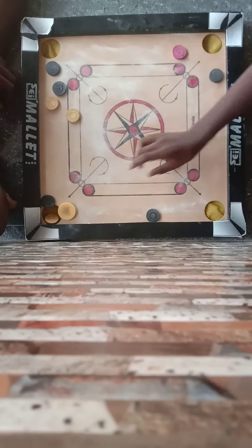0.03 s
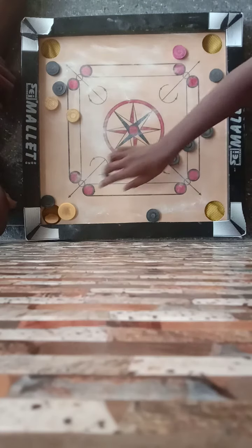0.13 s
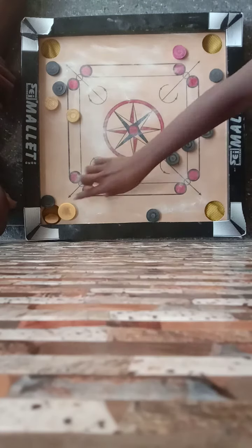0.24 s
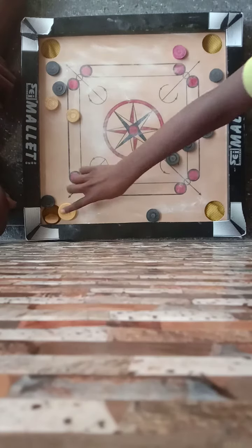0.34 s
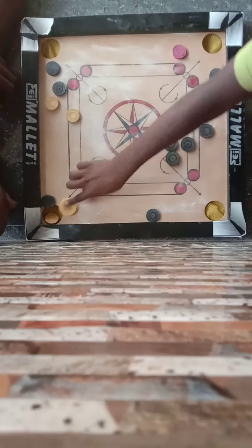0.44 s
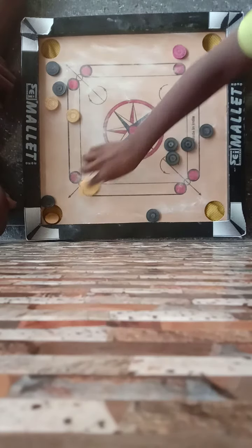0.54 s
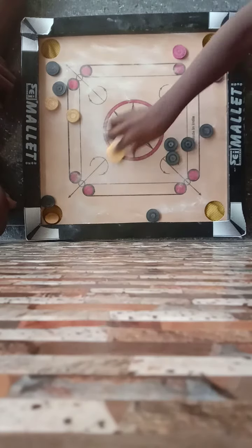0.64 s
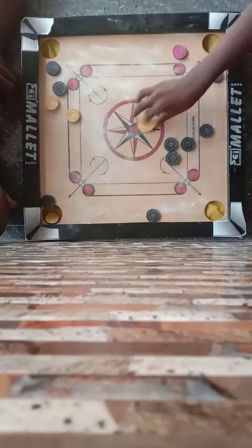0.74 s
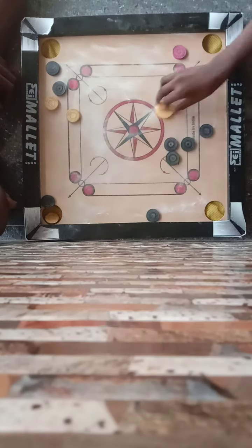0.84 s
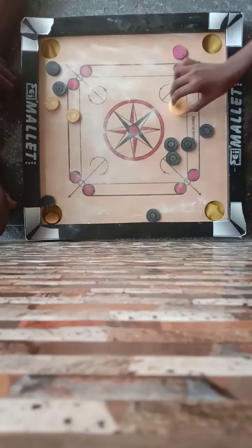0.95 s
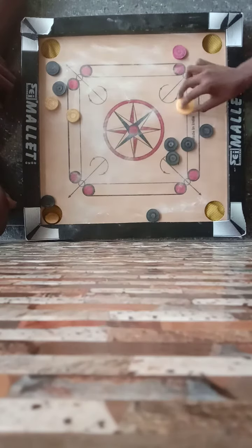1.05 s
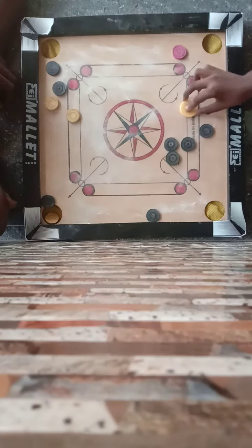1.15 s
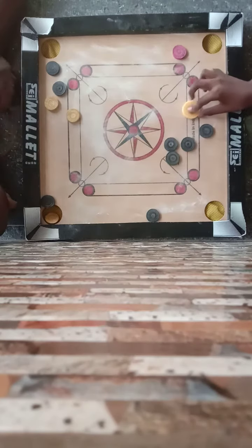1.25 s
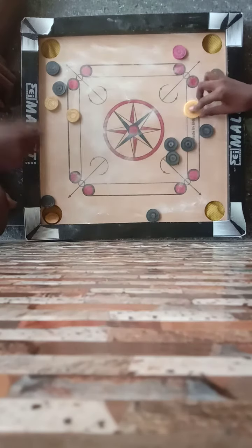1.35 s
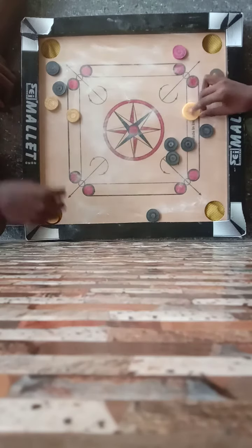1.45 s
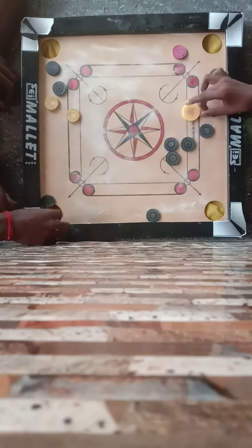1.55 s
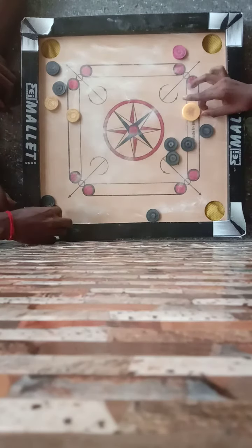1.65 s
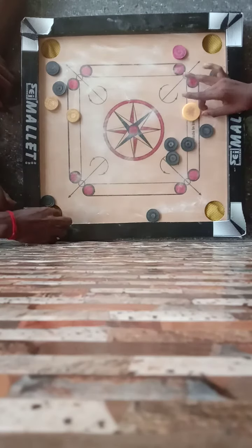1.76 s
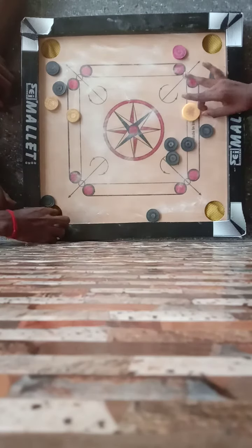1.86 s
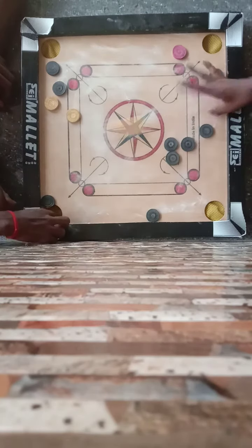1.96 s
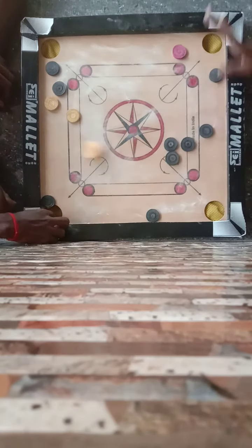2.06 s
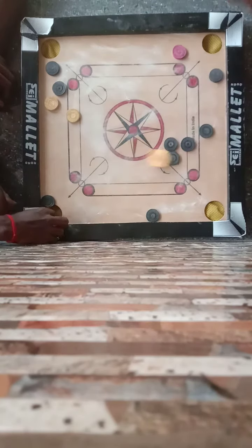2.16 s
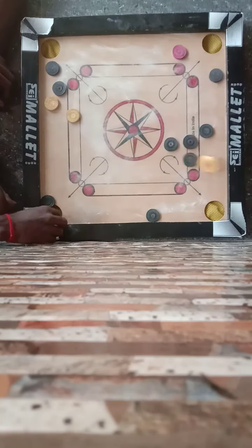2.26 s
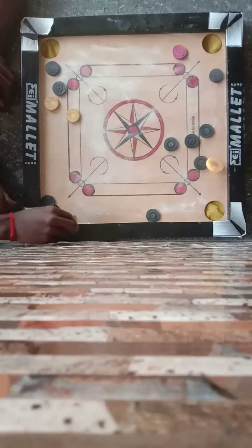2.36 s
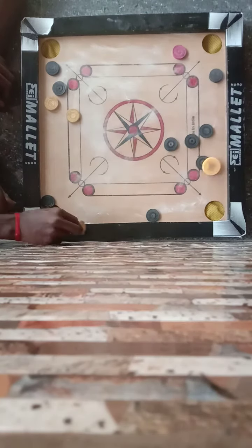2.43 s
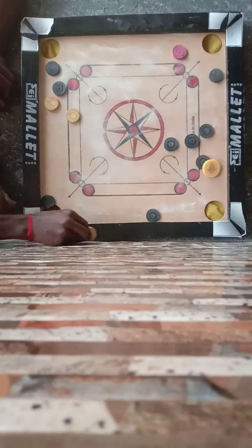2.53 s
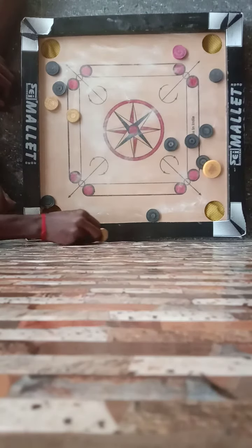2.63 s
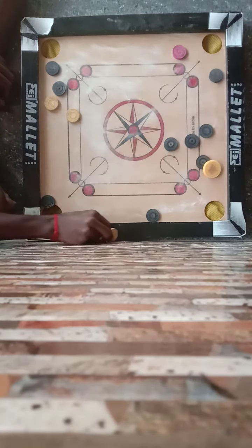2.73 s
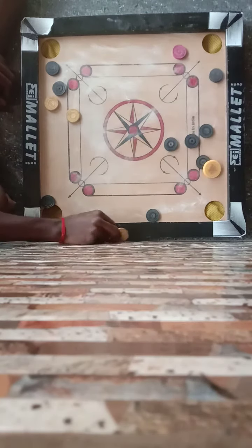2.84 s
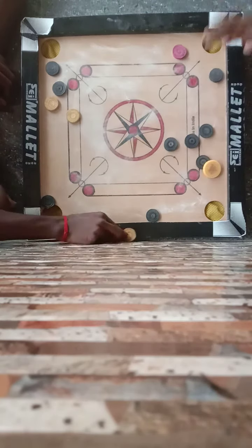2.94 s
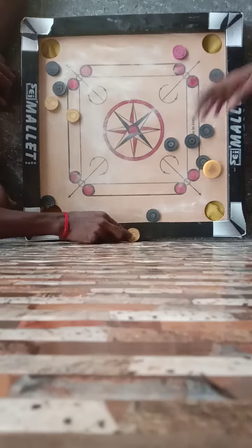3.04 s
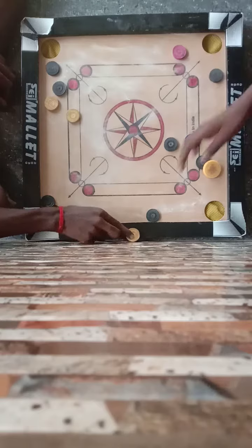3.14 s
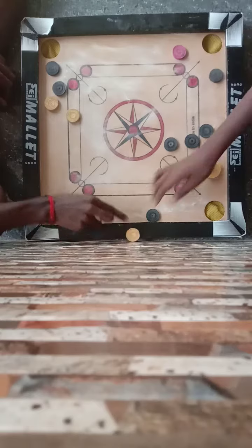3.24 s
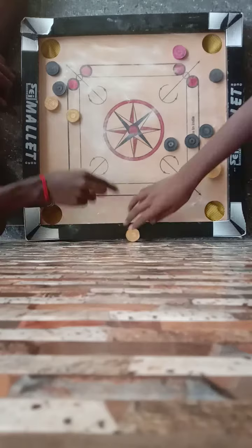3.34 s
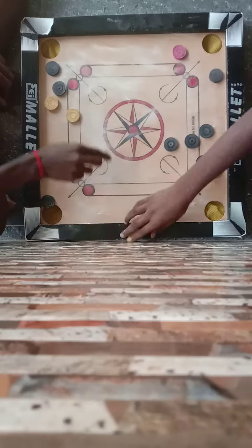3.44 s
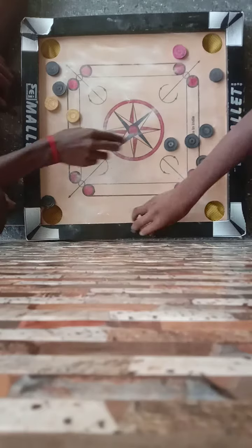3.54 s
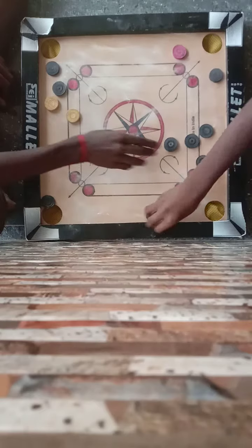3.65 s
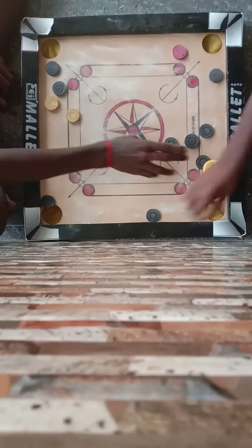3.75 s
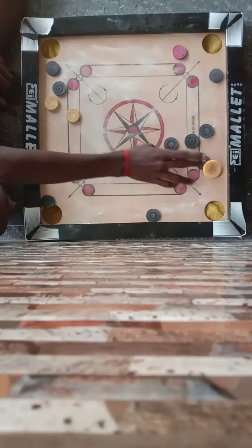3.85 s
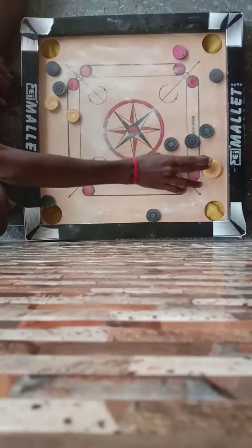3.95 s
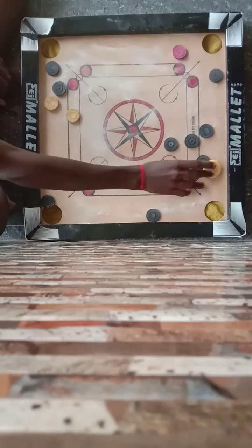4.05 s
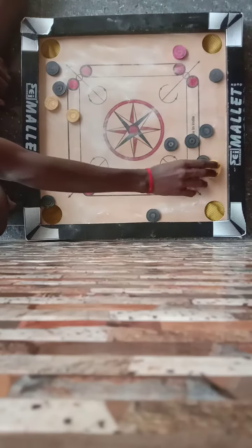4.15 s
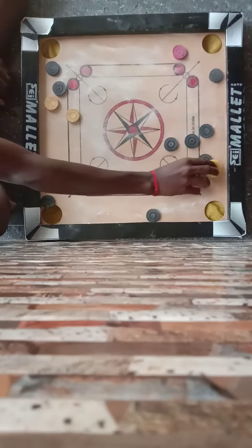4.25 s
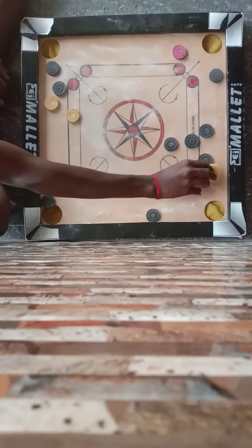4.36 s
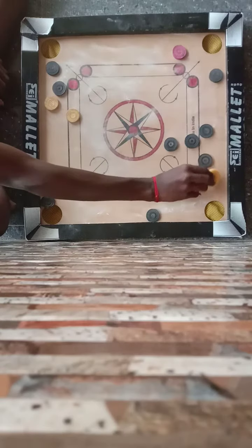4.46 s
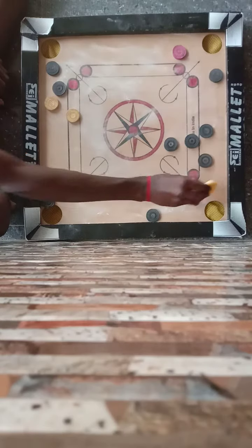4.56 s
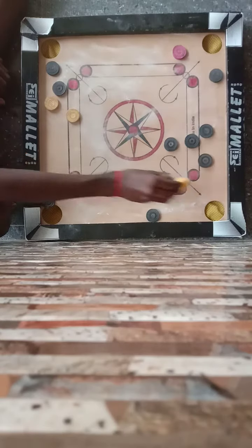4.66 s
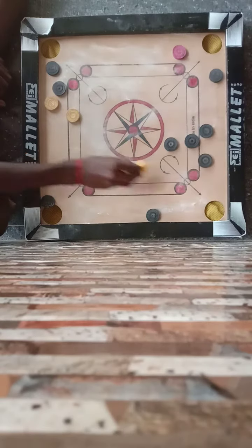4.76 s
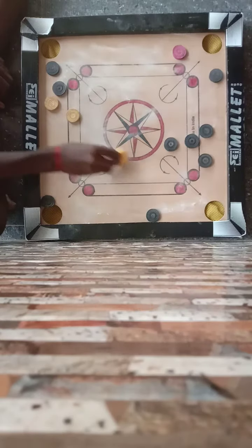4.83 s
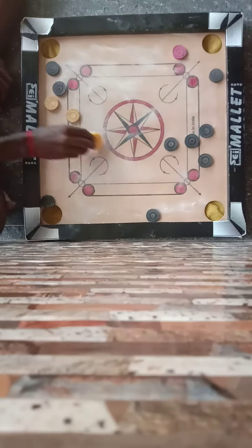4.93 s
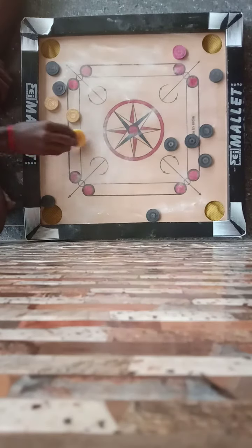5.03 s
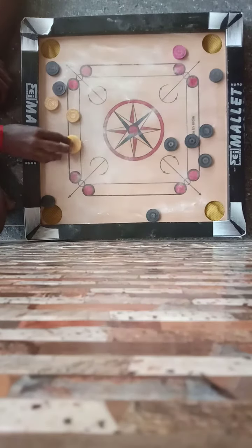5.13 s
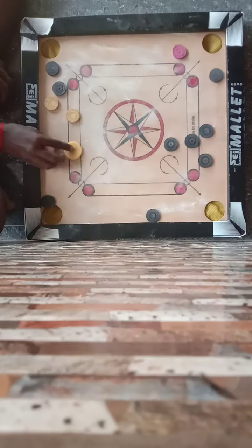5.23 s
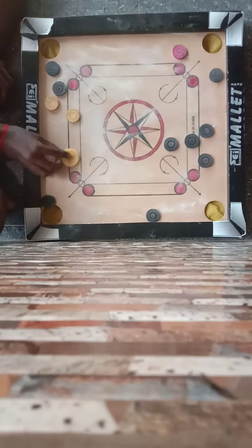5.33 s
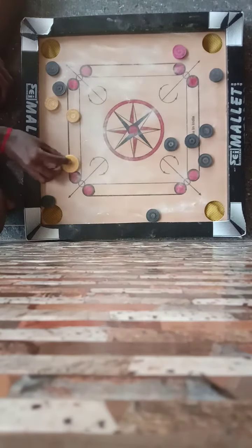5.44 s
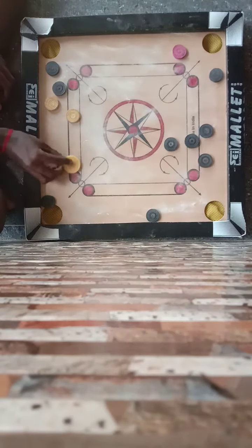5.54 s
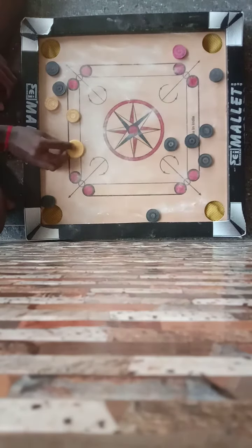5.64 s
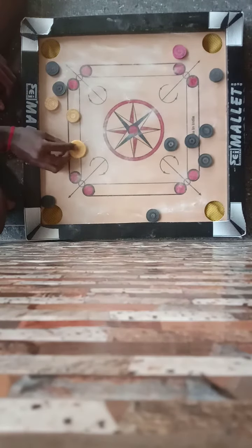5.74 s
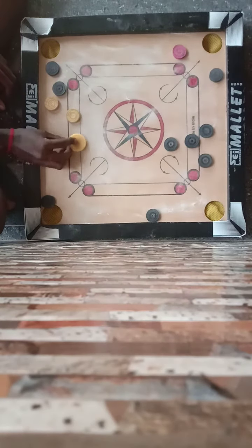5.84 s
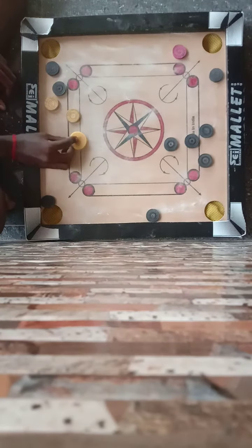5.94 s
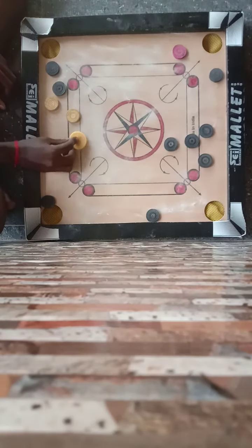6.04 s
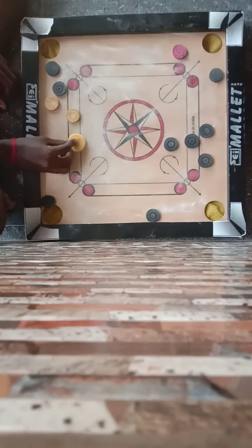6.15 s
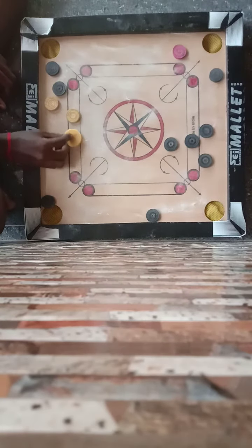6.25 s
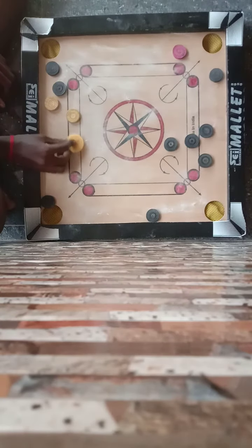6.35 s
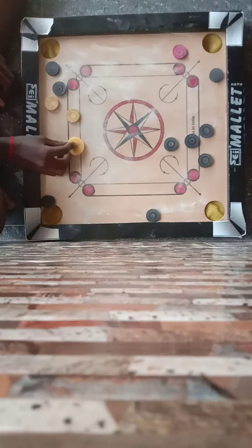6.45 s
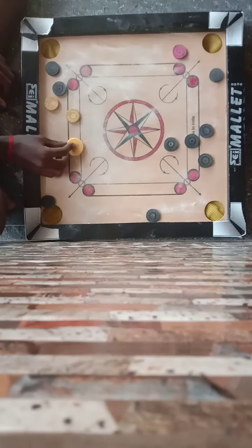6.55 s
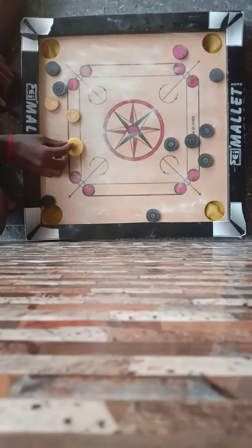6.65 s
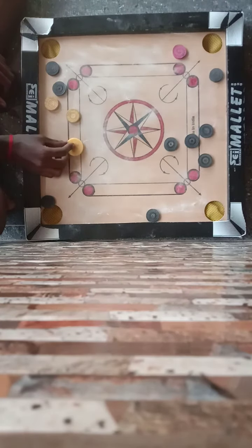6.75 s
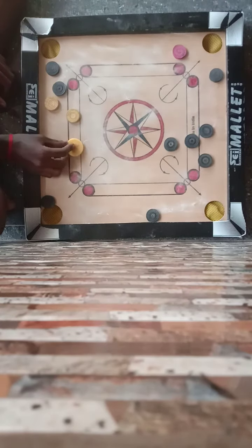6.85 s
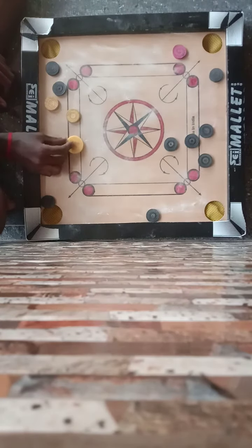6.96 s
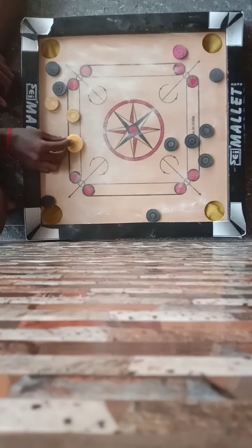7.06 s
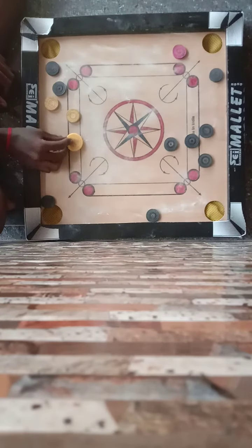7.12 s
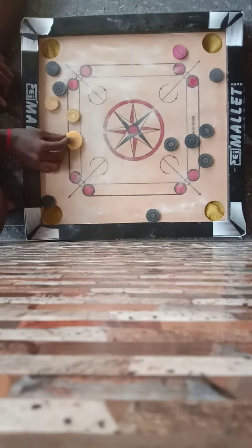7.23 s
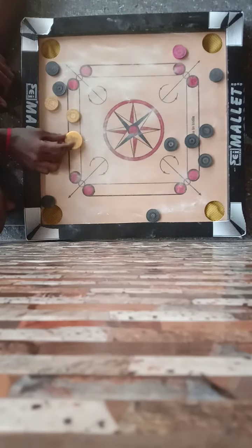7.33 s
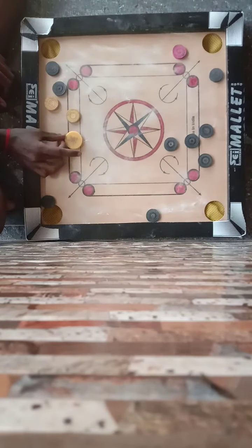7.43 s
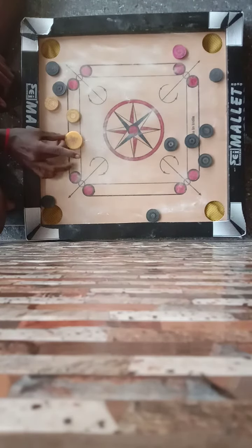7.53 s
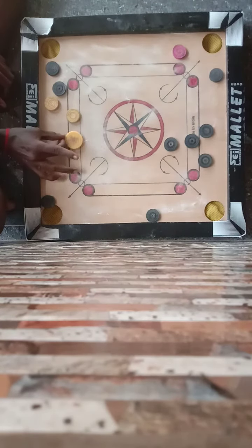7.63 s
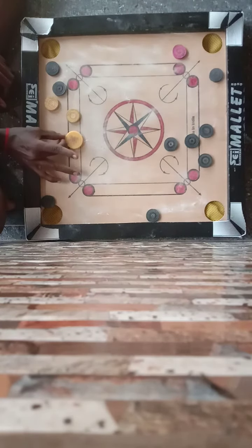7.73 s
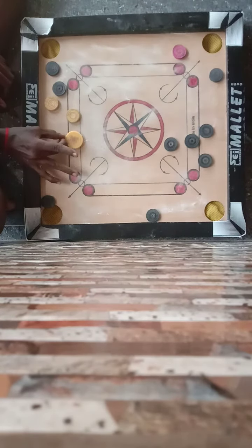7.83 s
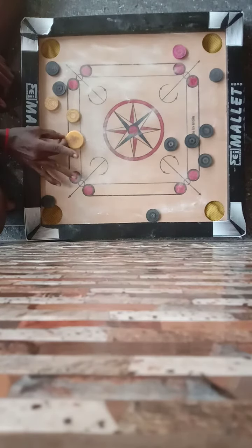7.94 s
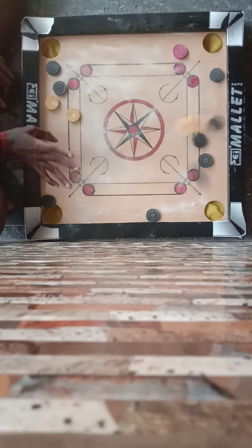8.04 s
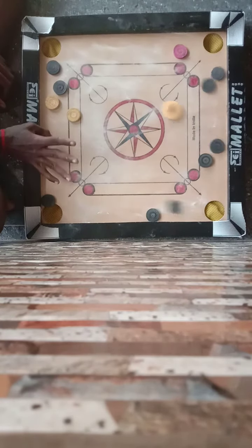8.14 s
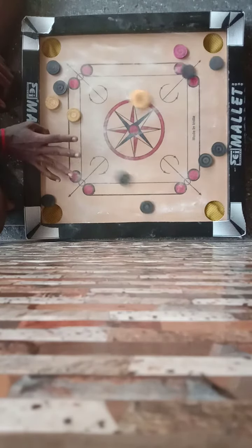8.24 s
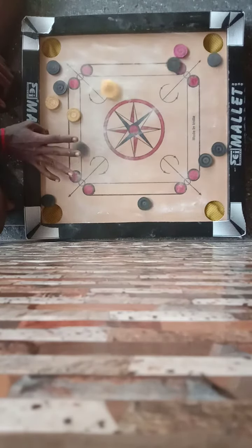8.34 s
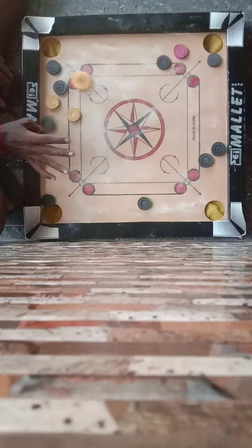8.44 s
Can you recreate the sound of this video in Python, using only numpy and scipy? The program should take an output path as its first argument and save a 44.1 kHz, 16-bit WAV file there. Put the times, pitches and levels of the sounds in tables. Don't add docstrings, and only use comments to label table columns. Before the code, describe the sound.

A heavy striker is flicked across a wooden board, clacking rapidly into discs and frame with knocky thumps, powdery scrapes and a second shot later.

```python
import sys
import numpy as np
from scipy import signal
from scipy.fft import rfft, irfft, next_fast_len
from scipy.io import wavfile
from scipy.ndimage import uniform_filter1d, minimum_filter1d, map_coordinates

SR = 44100
rng = np.random.default_rng(int(sys.argv[2]) if len(sys.argv) > 2 else 0)


def magnitude_from_level(level_db):
    exponent = np.asarray(level_db, float) / 20
    return 10 ** exponent


def to_wav(sig):
    pcm = np.clip(np.atleast_2d(sig), -1, 1) * 32767
    pcm = np.round(pcm).astype(np.int16)
    wavfile.write(sys.argv[1], SR, pcm.T)


N = 374409

# [t/s, level/dB]
TRAFFIC = [
    (0, -53),
    (0.64, -49),
    (1.25, -54),
    (2.24, -48.5),
    (3.5, -53.5),
    (4.8, -49.5),
    (6.93, -51),
    (7.83, -53.5),
    (8.49, -57),
]
# [f/Hz, density/dB per Hz]
HUM_SPECTRUM = [(15, -74), (25, -32), (70, -5.5), (172, 4.5), (205, 1), (339, 3), (420, -11.5), (500, -47),
                (650, -61), (1100, -120)]
DRONE_SPECTRUM = [(260, -55), (450, -1.5), (526, -73), (559, -1), (711, 9), (769, -4), (812, 5), (967, 0.5),
                  (1090, 3), (1270, 7.5), (1550, -4.5), (1900, -18), (2470, -55), (4180, -120)]
HISS_SPECTRUM = [(1300, -29), (1700, -3), (2300, -7.5), (3200, -9.5), (4500, -13), (6000, -14), (6700, -20),
                 (7300, -3), (8200, -13), (9500, -28.5), (11000, -33), (13700, -37), (15000, -35),
                 (15700, -32)]
# [f/Hz, width/Hz, level/dB]
WHINE_MODES = [(14900, 130, -9), (15100, 110, -15)]
# [t/s, length/s, start f/Hz, end f/Hz, level/dB]
BIRDS = [
    (.22, 0.077, 4200, 4420, -52),
    (.92, 0.094, 4580, 4640, -54),
    (1.19, 0.13, 3250, 3180, -62),
    (1.21, 0.11, 5200, 5100, -57),
    (1.64, 0.086, 4630, 4600, -57),
    (1.698, 0.05, 4200, 4280, -55),
    (3.355, 0.064, 4000, 4100, -56),
    (4.019, 0.05, 4170, 4300, -55),
]
# [t/s, peak level/dB, f/Hz]
PUFFS = [(2.629, -44, 90), (2.797, -43, 99), (3.085, -23.5, 97), (3.153, -31, 76.5), (3.257, -27.5, 124),
         (3.353, -28.5, 71), (3.414, -34, 107), (3.464, -22, 95), (3.508, -34, 76), (3.609, -38.5, 93),
         (3.679, -39, 56.5), (3.739, -37, 59), (3.769, -32, 106), (3.83, -40, 81), (3.908, -38, 67.4),
         (6.236, -40, 122), (6.562, -42, 86.5), (6.72, -41, 77.6), (7.202, -46, 75), (7.372, -35.5, 103),
         (7.462, -33, 86), (7.501, -34, 83), (7.568, -33.5, 96), (7.659, -36, 78), (7.699, -38, 54),
         (7.738, -31, 89.5), (7.775, -31, 96), (7.819, -42, 67), (7.864, -35.5, 149), (7.889, -35.5, 78)]
# [f/Hz, t60/s]
ROOM_T60 = [(200, 0.22), (500, 0.16), (1400, 0.28), (4000, 0.28), (10000, 0.21)]
# [f/Hz, width/Hz, level/dB]
BOOM_MODES = [(325.7, 8.2, -2), (418.2, 19.6, 3), (485, 63, -8.5)]
# [f/Hz, width/Hz, level/dB]
KNOCK_MODES = [(577, 28, 0), (712.6, 22, -0.5), (816.3, 30, 0), (940, 45, 1), (1089, 124, 1),
               (1246.7, 45.7, 10), (1546, 270, -3.5), (1563, 94, 1), (2130, 710, -13.5)]
# [f/Hz, width/Hz, level/dB]
SNAP_MODES = [(760, 170, -4), (1210, 144, 2)]
# [f/Hz, density/dB per Hz]
CLICK_SPECTRUM = [(1000, -42), (1700, -1), (2600, 2), (4200, 1), (6000, -0.5), (6700, -2), (7400, 1),
                  (8600, -11), (10000, -18.5), (12500, -37.5), (14000, -27), (15000, -27), (15600, -43),
                  (15800, -101)]
POWDER_SPECTRUM = [(1000, -55), (1700, -4), (1880, 0.5), (2470, -2.5), (2710, 0.5), (3140, -1), (4310, 2),
                   (5140, -2), (7250, 4.5), (11000, -13), (13400, -24), (14800, -10), (15700, -11)]
# [t/s, length/s, rumble level/dB, powder level/dB, low modes rel. level/dB]
DRAGS = [(0.0, 0.058, -56, -91, -16), (0.19, 0.3, -54, -72, -20), (0.385, 0.16, -32, -50, -5),
         (0.42, 0.49, -26, -31.5, -6.5), (3.49, 0.054, -46, -40.5, -18), (3.52, 0.095, -41.5, -48.5, -5),
         (3.6, 0.14, -78, -46.5, -10), (3.72, 0.089, -62, -43.5, -3), (3.8, .12, -53, -46, -6),
         (3.92, 0.11, -57, -56, -9), (4.18, 0.14, -55, -67, 7.5), (4.28, 0.13, -38, -52.5, -29),
         (4.41, 0.1, -37.5, -54, -19), (4.86, 0.18, -47, -43, -5), (5.26, 0.23, -36, -50.5, -26),
         (5.55, 0.11, -28.5, -39.5, -9), (5.74, 0.14, -40.5, -59, -2.5), (6.19, 0.1, -39, -52.5, -10),
         (6.32, 0.095, -37, -48, -18), (6.81, 0.35, -53, -66, -5), (5.96, 0.11, -79, -81, -7),
         (7.56, 0.18, -53, -68, -22), (7.93, 0.076, -40.5, -52, -2), (8.03, 0.17, -18.5, -25.5, -12.5)]
# [t/s, length/s, rumble level/dB, powder level/dB, low modes rel. level/dB]
GLIDES = [(1.1, 0.41, -49.5, -64, -5), (1.928, 0.31, -30.5, -32.5, 1), (2.02, 0.27, -19.5, -29.5, -17.5),
          (2.15, 0.092, -17, -53, -11), (2.32, 0.097, -16, -47, -9.5), (2.41, 0.19, -22, -32, -15),
          (2.87, 0.04, -42.5, -34, 17), (4.84, 0.46, -27, -41.5, -14.5), (5.11, 0.43, -40.5, -51.5, -9),
          (7.46, 0.068, -70, -65, -6), (7.97, 0.11, -30.5, -29.5, 2.5), (8.2, 0.67, -25.5, -36.5, -6.5),
          (8.45, 0.17, -24.5, -40, -17)]
# [t/s, rumble level/dB]
RESTING = [
    (0, -46.5),
    (1.7, -47),
    (2.7, -51),
    (4.1, -48),
    (4.75, -48),
    (6.0, -42.5),
    (6.9, -50),
    (7.6, -52.5),
    (8.49, -38),
]
# [t/s, knock/dB, boom rel./dB, click rel./dB, first arrival rel./dB]
ON_BOARD = [(0.145, -28.5, -14, -39, -14), (0.396, -24, -9, -32, -9), (0.46, -13.5, 8.5, -20, -11),
            (0.494, -10, 4.5, -39, -2), (1.424, -25, 2.5, -44, 2), (2.143, -1, 1.5, -24, -8),
            (4.828, -2, 2.5, -24.5, -5), (4.857, -9.5, -23, -33, -13), (4.885, -25, -17, -35, -7),
            (5.104, 0.5, -3.5, -27, -4), (5.772, -32, -25, -44, -6)]
# [t/s, knock/dB, boom rel./dB, click rel./dB, first arrival rel./dB]
STRIKER = [(1.089, -3, -7, -19, -5), (1.128, -15, -18, -41, 3), (1.195, -24.5, -20, -39, -7),
           (1.251, -26, -5, -32, -10), (1.967, -7, -6, -17.5, -23), (1.998, -3, -13, -37, -9),
           (2.017, -3, -3.5, -5.5, 0), (2.064, -14.5, -22, -0.5, -15), (2.181, -4, -8, -16, 0),
           (2.356, -6.5, -30, -27, -4), (2.375, -4, -30, -29, -7), (2.387, -2.5, -23, -33, -5),
           (2.463, -1, -28, -17.5, -1), (2.504, -4.5, -35, -20, 1), (8.063, -8, -34, -2.5, -5),
           (8.083, -17.5, -20, 2.5, -11)]
# [t/s, knock/dB, boom rel./dB, click rel./dB, first arrival rel./dB]
FLICKS = [
    (1.943, -8.5, -11, -22, -5),
    (2.025, -20, 9, -4, -3),
    (2.867, -10.5, -5, -3.5, -4),
    (3.52, -26, -21, -20, -7),
    (3.721, -42, 27, 0.5, -9),
    (7.456, -44.5, -14, 10.5, -2),
    (7.969, -13.5, -12, -16, -16),
    (8.02, -9.5, 0, -9.5, -6),
    (8.031, -9.5, -5, -7, -8),
]
# [t/s, knock/dB, boom rel./dB, click rel./dB, first arrival rel./dB]
DISCS = [
    (1.457, -34, 12, -37, 0),
    (2.276, 0, -8, -24.5, -4.5),
    (2.333, -7, -27, -16, 2.5),
    (2.412, -11.5, 1.5, -2.5, -1.5),
    (2.439, -6.5, -27, -21, 1.5),
    (3.061, -41, 17.5, -31.5, -13),
    (3.554, -24, 12.5, -26, -15),
    (6.335, -22, -32, -23, -18),
    (8.147, -8, -21, -7, -8),
]
# [t/s, knock/dB, boom rel./dB, click rel./dB, first arrival rel./dB]
FRAME = [
    (2.3, -1.5, -18.5, -32, -3),
    (2.317, -2.5, -9, -20, -13),
    (2.771, -15.5, -11, -20.5, -8),
    (6.854, -40.5, -16, -4, 3),
    (8.177, -6, -15, -20, -1),
    (8.19, -11, -24, -24, -1),
    (8.288, -14, -15, -30, -3),
    (8.456, -13.5, -5, -12.5, 1),
]
# [ring f/Hz, brightness/dB per octave, favoured mode f/Hz, mode lift/dB,
#                   room rel. knock/dB, ring level/dB]
KINDS = [
    (4100, -8.5, 770, 1, -11, -6),
    (4600, 1, 1720, 10, -8, -0.5),
    (5870, 16.5, 920, 1, -5.5, 10),
    (7300, 4, 1380, 2.5, -4, -2),
    (3670, -26, 786, 13, -3, -12),
]
# [f/Hz, rel. level/dB]
SIDE_SPECTRUM = [(60, -48), (200, -38), (400, -49.5), (1300, -45.5), (2500, -48), (5000, -43), (8000, -51),
                 (13000, -29)]
# [t/s, length/s, gain/dB]
DUCKS = [
    (2.394, .009, 1),
    (8.004, 0.0059, -7),
    (8.046, 0.0087, -6.5),
]

DRONE_DB, HISS_DB, WHINE_DB = -51, -61, -84
PUFF_T60_S = 0.12
PUSH_OFF_S = 0.013
LINGER_S = 0.02
RUMBLE_POWER, HISS_POWER = 1, 1.96
REST_HISS_DB, REST_DEEP_DB, REST_SHIFT_DB, REST_HISS_SHIFT_DB = -17, -9, 3.5, 1.5
LEAD_S = 0.0077
SPOT_DB = 2.5
CONTACT_SAMPLES = 16384
TOP_HZ = 15800


def unit(x):
    return x / np.sqrt(np.mean(x ** 2) + 1e-20)


def peak_one(x):
    return x / np.max(np.abs(x))


def along(points, hz):
    f, v = np.transpose(points)
    return np.interp(np.log(hz + 1), np.log(f + 1), v)


def filtered(x, response):
    m = next_fast_len(len(x) + 8192)
    return irfft(rfft(x, m) * response(np.fft.rfftfreq(m, 1 / SR)), m)[:len(x)]


def coloured(x, spectrum):
    return filtered(x, lambda f: magnitude_from_level(along(spectrum, f)))


def resonances(f, modes):
    responses = []
    for k, (centre, width, db) in enumerate(modes):
        loss = 1j * f * width
        responses.append((-1) ** k * magnitude_from_level(db) * loss / (centre * centre - f * f + loss))
    return np.array(responses)


def rung(x, modes):
    return filtered(x, lambda f: resonances(f, modes).sum(axis=0))


def wobble(rate_hz):
    knots = rng.standard_normal(int(N * rate_hz / SR) + 4)
    return map_coordinates(knots, [np.arange(N) * rate_hz / SR])


def patchy(depth_db, size):
    z = signal.stft(rng.standard_normal(N), nperseg=512)[2]
    field = uniform_filter1d(rng.standard_normal(z.shape), size // 2, axis=0)
    field = uniform_filter1d(field, 2 * size, axis=1)
    return signal.istft(z * magnitude_from_level(depth_db * unit(field)), nperseg=512)[1][:N]


def reverb(count):
    hz, t, z = signal.stft(rng.standard_normal(count), SR, nperseg=256)
    decay = magnitude_from_level(-60 * t / along(ROOM_T60, hz)[:, None])
    tail = signal.istft(z * decay, SR, nperseg=256)[1][:count]
    tail *= np.clip(np.arange(count) / SR / 0.007, 0, 1) ** 1.3
    return tail / np.linalg.norm(tail)


def outdoors():
    hum = unit(magnitude_from_level(1.1 * wobble(4.8)) * coloured(patchy(5, size=3), HUM_SPECTRUM))
    hum = unit(hum + 1.26 * rung(hum, [(173.2, 8.4, 0.0073)]))
    drone = unit(magnitude_from_level(1.17 * wobble(2.965)) * coloured(patchy(2.2, size=4), DRONE_SPECTRUM))
    hiss = unit(coloured(patchy(2.5, size=4), HISS_SPECTRUM))
    whine = unit(rung(rung(rng.standard_normal(N), WHINE_MODES), WHINE_MODES))
    hum_db = np.interp(np.arange(N) / SR, *np.transpose(TRAFFIC)) + 2.0
    return magnitude_from_level(hum_db) * hum + magnitude_from_level(DRONE_DB) * drone + magnitude_from_level(HISS_DB) * hiss + magnitude_from_level(WHINE_DB) * whine


def birds():
    out = np.zeros(N + SR)
    flock = rng.random((130, 5)) * [N / SR, 0.1, 4000, 300, 9] + [0, 0.04, 1900, -150, -74]
    flock[:, 3] += flock[:, 2]
    for s, length_s, start_hz, end_hz, db in [*BIRDS, *flock]:
        count = round(length_s * SR)
        waver = uniform_filter1d(rng.standard_normal(SR // 5), size=80)[:count]
        hz = np.linspace(start_hz, end_hz, count) + 500 * waver
        whistle = np.hanning(count) * np.sin(2 * np.pi * np.cumsum(hz) / SR)
        out[round(s * SR):][:count] += magnitude_from_level(db) * whistle
    return 0.53 * out[:N] + 0.49 * signal.fftconvolve(out, reverb(count=SR // 3))[:N]


def puffs():
    out, t = np.zeros(N + SR), np.arange(SR // 3) / SR
    envelope = magnitude_from_level(-60 * t / PUFF_T60_S) * (1 - np.exp(-t / 0.0018))
    for s, db, hz in PUFFS:
        swing = np.sin(2 * np.pi * hz * t * (1 - 2.0 * t))
        out[round(s * SR):][:len(t)] += magnitude_from_level(db) * peak_one(swing * envelope)
    return out[:N]


def dulled(x):
    return signal.sosfilt(signal.butter(4, 2200, fs=SR, output="sos"), x)


def drag_speed(t, length_s):
    return np.sin(np.pi * t / length_s)


def glide_speed(t, length_s):
    return np.minimum(t / PUSH_OFF_S, 1) * (1 - t / length_s)


def strokes(rows, speed):
    out = np.zeros((3, N + SR))
    for s, length_s, rumble_db, hiss_db, deep_db in rows:
        t = np.arange(round(length_s * SR)) / SR
        v = np.clip(speed(t, length_s), 0, 1)
        rumble = magnitude_from_level(rumble_db) * v ** RUMBLE_POWER
        gains = [rumble, magnitude_from_level(deep_db) * rumble, magnitude_from_level(hiss_db) * v ** HISS_POWER]
        out[:, round(s * SR):][:, :len(v)] += gains
    keep = np.exp(-1 / (LINGER_S * SR))
    return np.maximum(out, signal.lfilter([1 - keep], [1, -keep], out))[:, :N]


def slides():
    moving = strokes(DRAGS, drag_speed) + strokes(GLIDES, glide_speed)
    shift_db = [[REST_SHIFT_DB], [REST_SHIFT_DB], [REST_HISS_SHIFT_DB]] * wobble(20)
    rest_db = np.interp(np.arange(N) / SR, *np.transpose(RESTING)) + shift_db
    high_gain, low_gain, powder_gain = moving + magnitude_from_level(rest_db) * magnitude_from_level([[0], [REST_DEEP_DB], [REST_HISS_DB]])

    grit = dulled(magnitude_from_level(2.5 * wobble(120) + 0.5 * wobble(20)) * patchy(2, size=3))
    high = magnitude_from_level(-7.5) * unit(rung(grit, KNOCK_MODES[3:]))
    low = unit(unit(rung(grit, KNOCK_MODES[:3])) + 0.66 * unit(rung(grit, BOOM_MODES)))

    hiss = unit(magnitude_from_level(0.6 * wobble(90)) * coloured(patchy(1.4, size=5), POWDER_SPECTRUM))
    treble = coloured(hiss, [(5000, -19.5), (9000, -2.0)])
    hiss -= treble * (1 - np.minimum((powder_gain / magnitude_from_level(-16.0)) ** 0.57, 1))
    return high_gain * high + low_gain * low + powder_gain * hiss


def causal_click(spectrum, tilt_db, size):
    hz = np.fft.rfftfreq(size, 1 / SR)
    db = along(spectrum, hz) + tilt_db * np.log2(np.clip(hz / 5000, 1, 2.2))
    cepstrum = irfft(np.log(magnitude_from_level(db) + 1e-6), size)
    cepstrum[1:size // 2] *= 2
    cepstrum[size // 2 + 1:] = 0
    return irfft(np.exp(rfft(cepstrum)), size)


def contact(boom_db, click_db, first_db, kind, room):
    ring_hz, air_db, mode_hz, lift_db, wet_db, ring_db = kind
    size = CONTACT_SAMPLES
    t, f = np.arange(size) / SR, np.fft.rfftfreq(size, 1 / SR)

    push = rfft(dulled(magnitude_from_level(-60 * t / 0.0014) * (1 + 0.2 * rng.standard_normal(size))))
    octave_like = np.log(np.array(KNOCK_MODES)[:, 0] / mode_hz) / 0.12
    spot_db = SPOT_DB * rng.standard_normal(len(KNOCK_MODES)) + lift_db * np.exp(-octave_like ** 2)
    knock = peak_one(irfft(push * (magnitude_from_level(spot_db) @ resonances(f, KNOCK_MODES))))
    boom = peak_one(irfft(push * resonances(f, BOOM_MODES).sum(axis=0)))
    snap = peak_one(irfft(push * resonances(f, SNAP_MODES).sum(axis=0)))

    crack = causal_click(CLICK_SPECTRUM, air_db, size=1024)
    crack = rfft(crack / np.linalg.norm(crack), size)
    crack = crack * (1 + resonances(f, [(ring_hz, 420, ring_db)])[0])
    grains = magnitude_from_level(-60 * t / 0.0082) * (rng.standard_normal(size) + 3 * (t == 0))
    chatter = peak_one(irfft(crack * rfft(grains)))

    near = (0.54 * knock + magnitude_from_level(boom_db - 9.0) * boom) * magnitude_from_level(-60 * t / 0.08)
    near = near + 0.29 * snap + magnitude_from_level(click_db + 6.0) * chatter
    far = rfft(magnitude_from_level(wet_db) * knock + magnitude_from_level(boom_db - 11.5) * boom) + magnitude_from_level(click_db + 20.5) * crack
    loud = np.pad(near, (round(LEAD_S * SR), 0))[:size]
    return magnitude_from_level(first_db) * near + loud + irfft(far * room)


def contacts():
    out = np.zeros(N + CONTACT_SAMPLES)
    rooms = [rfft(reverb(count=SR // 4), CONTACT_SAMPLES) for _ in range(16)]
    tables = (ON_BOARD, STRIKER, FLICKS, DISCS, FRAME)
    blows = [(row, kind) for table, kind in zip(tables, KINDS) for row in table]
    for k, ((s, db, boom_db, click_db, first_db), kind) in enumerate(blows):
        heard = contact(boom_db, click_db, first_db, kind, rooms[k % len(rooms)])
        start = round(s * SR) - round(LEAD_S * SR)
        out[start:][:CONTACT_SAMPLES] += magnitude_from_level(db - 3.0) * heard
    return out[:N]


def scene():
    mono = outdoors() + birds() + puffs() + slides() + contacts()
    side = magnitude_from_level(5) * coloured(mono * wobble(60), SIDE_SPECTRUM)
    return np.array([mono + side, mono - side])


def microphone(f):
    notch = 1 - 0.5 * np.exp(-((f - 6700) / 220) ** 2)
    return notch * np.clip((TOP_HZ - f) / 150, 0, 1) / (1 - 1j * 45 / (f + 1))


def limiter_gain(x):
    need = np.minimum(1, 0.58 / (np.abs(x) + 1e-9))
    gain = uniform_filter1d(minimum_filter1d(need, size=441), size=221)
    t, duck_db = np.arange(N) / SR, np.zeros(N)
    for s, length_s, db in DUCKS:
        duck_db += db * np.clip(3 - 6 * np.abs((t - s) / length_s - 0.5), 0, 1)
    return gain * magnitude_from_level(duck_db)


def top_cut(x):
    return signal.sosfilt(signal.butter(12, 16800, fs=SR, output="sos"), x)


def record(dry):
    heard = np.array([filtered(x, microphone) for x in dry])
    mix = heard * limiter_gain(heard[0])
    return top_cut(mix)


dry = scene()
out = record(dry)
to_wav(out)
```